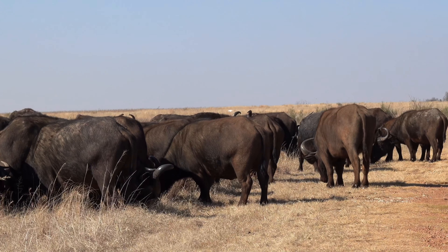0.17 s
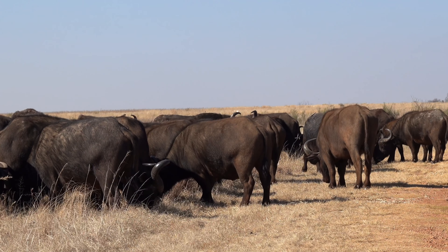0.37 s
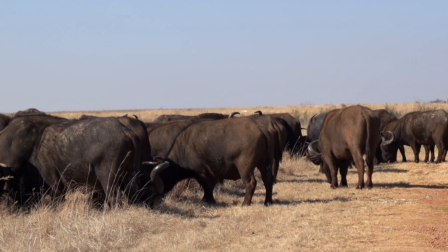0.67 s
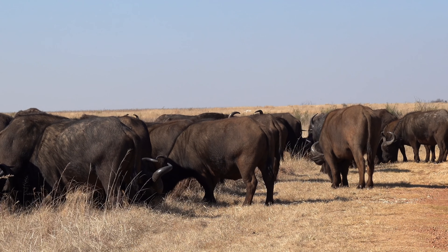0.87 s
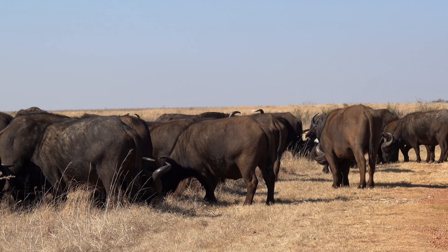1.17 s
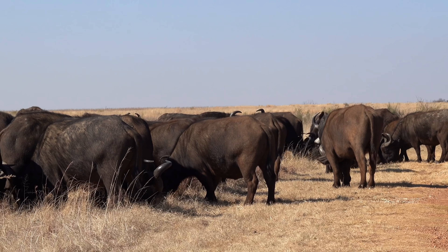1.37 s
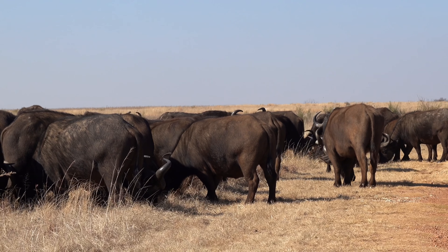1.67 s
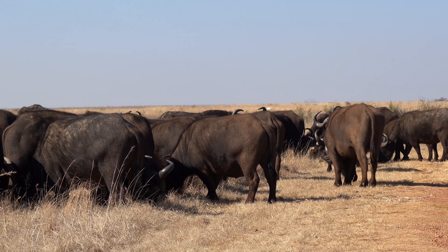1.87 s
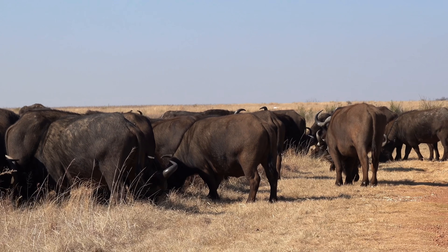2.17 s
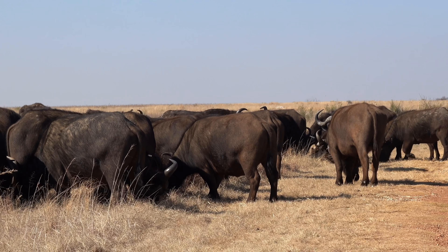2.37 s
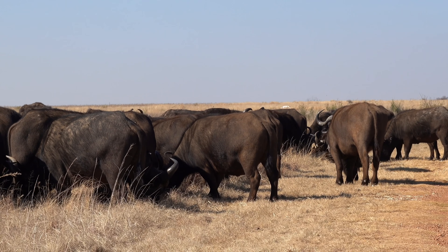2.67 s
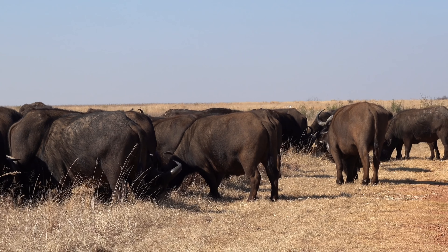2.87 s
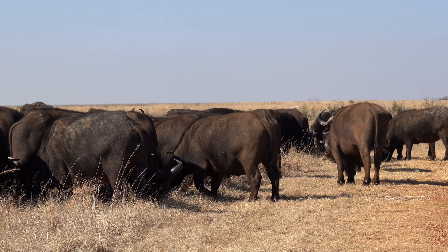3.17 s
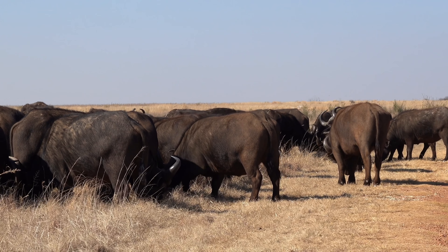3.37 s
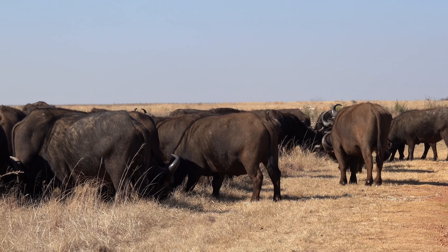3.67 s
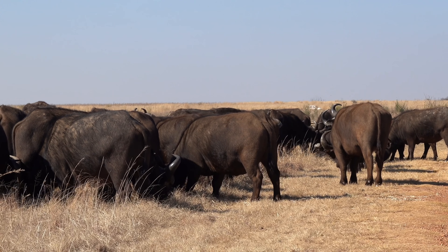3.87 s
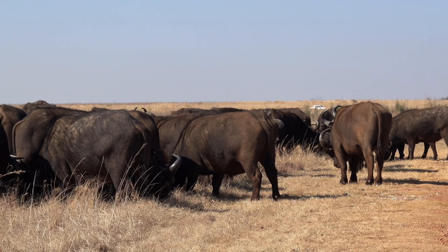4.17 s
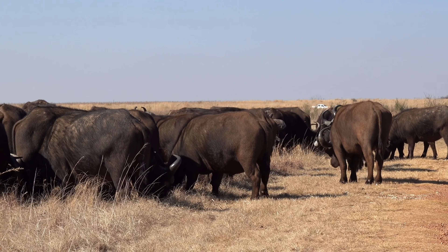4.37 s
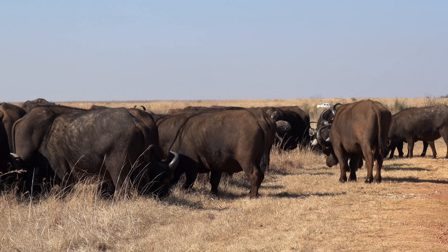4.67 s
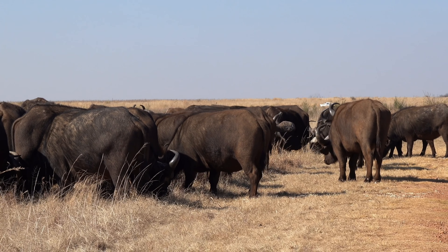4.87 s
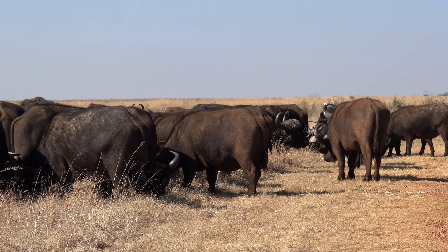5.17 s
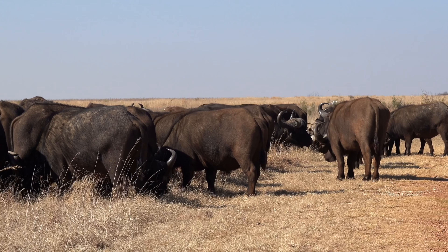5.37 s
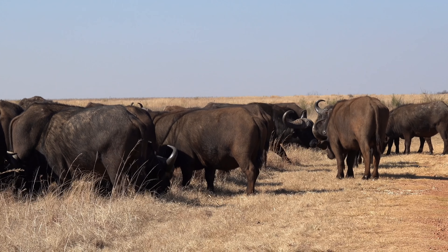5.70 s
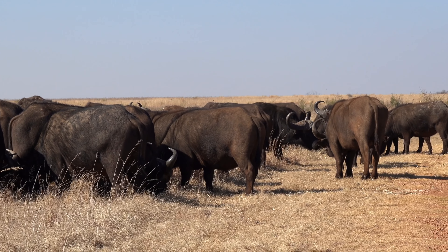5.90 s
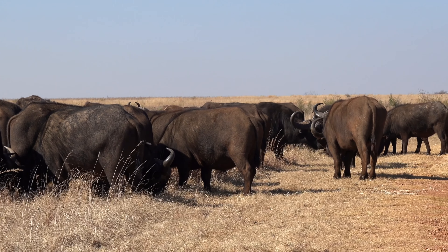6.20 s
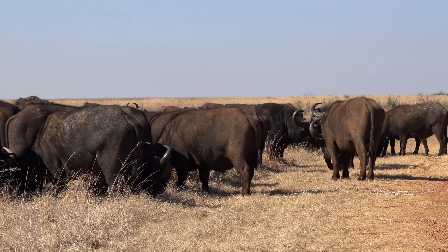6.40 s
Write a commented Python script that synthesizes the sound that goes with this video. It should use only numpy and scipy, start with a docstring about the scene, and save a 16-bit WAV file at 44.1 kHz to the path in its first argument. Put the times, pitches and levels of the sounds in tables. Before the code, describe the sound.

A buffalo grunts, then twice growls and swells into a deep bellow, with dry stalks snapping between the calls in quiet grassland.

```python
"""The sound switches on with a sharp click; over faint grassland wind and an insect trill, a buffalo grunts.
Its vocal folds flap, stick and burst open, ringing a long throat; one effort drives chest, mouth and rasp.
It rumbles, then swells from a slow growl into a bellow that ends in a slack flap and a huff of air.
Dry stalks rustle and snap under the hooves. Then a second growl swells into a bellow, its loudest
pulses overloading the microphone, and a last huff dies away."""
import sys
import numpy as np
from scipy import signal
from scipy.io import wavfile

SR = 44100
rng = np.random.default_rng(int(sys.argv[2]) if len(sys.argv) > 2 else 0)


def wrap_up_sound(samples):
    """Save the sound to the file named by the first command line argument, as 16-bit audio."""
    columns = np.atleast_2d(samples).T
    # keep every value between -1 and 1, then stretch to whole-number steps
    tamed = np.clip(columns, -1, 1)
    steps = np.round(tamed * 32767).astype(np.int16)
    wavfile.write(sys.argv[1], SR, steps)


N = 288414
TIME = np.arange(N) / SR


def gain_of(db):
    """Turns decibels into a multiplier."""
    return 10 ** (np.asarray(db) / 20)


def evened(x):
    """Scales a sound to an average (rms) level of 1."""
    return x / np.sqrt(np.mean(x ** 2) + 1e-20)


def steadied(x, span_s):
    """Holds the running level near 1 while keeping the single pulses."""
    window = np.hanning(int(span_s * SR))
    weight = signal.fftconvolve(np.ones(len(x)), window, "same")
    power = signal.fftconvolve(x ** 2, window, "same") / weight
    return x / np.sqrt(power + np.mean(x ** 2) / 100)


def curves(rows, t):
    """Joins the rows of a table by straight lines in time."""
    times, *columns = np.transpose(rows)
    return [np.interp(t, times, column) for column in columns]


def look_up(points, hz):
    """Reads a table's value at any pitch."""
    pitches, values = np.transpose(points)
    return np.interp(np.log(hz + 1), np.log(pitches + 1), values)


def add(mix, start_s, sound):
    """Lays a sound into the mix."""
    part = mix[max(round(start_s * SR), 0):][:len(sound)]
    part += sound[:len(part)]


def colour(x, points, size=2048):
    """Shapes the tone of a sound with (pitch_hz, level_db) points."""
    log_gain = np.log(gain_of(look_up(points, abs(np.fft.fftfreq(size, 1 / SR)))))
    taps = np.fft.ifft(np.exp(np.conj(signal.hilbert(log_gain)))).real[:size // 2]
    return signal.fftconvolve(x, taps)[:len(x)]


def resonate(x, hz, width_hz):
    """Makes a sound ring at a pitch that may glide; narrower rings longer."""
    turn = np.exp(2j * np.pi * np.cumsum(hz * np.ones(len(x))) / SR)
    decay = np.exp(-np.pi * width_hz / SR)
    return 2 * (turn * signal.lfilter([1 - decay], [1, -decay], x / turn)).real


# The tone of open air: pitch_hz, level_db
WIND_TONE = [(25, -16.5), (60, -9.5), (120, -3.5), (250, -7.5), (500, -5.5), (950, -5.5), (1500, -13.5),
             (2500, -20), (4000, -25.5), (8000, -36), (15500, -39)]
def wind(level_db=-70.5):
    """Moving air makes a soft, steady rush."""
    return gain_of(level_db) * evened(colour(rng.standard_normal(N), WIND_TONE))


# The tone of dry grass: pitch_hz, level_db
GRASS_TONE = [(1000, -2.5), (2500, -2.5), (4500, -2.5), (7000, -7), (11000, -15), (16000, -15)]
# How the rustling rises and falls: time_s, relative_level_db
RUSTLE_SWELLS = [(3.3, -88), (3.474, -94), (3.778, -81.5), (4.128, -87), (4.242, -81.5), (4.436, -86.5),
                 (4.758, -92.5), (5.0, -88)]
def rustle(spread_db=3, grains_per_s=2500, boost_db=4.5):
    """Hooves shuffle through dry grass, making many tiny ticks."""
    grains = rng.standard_normal(N) * gain_of(spread_db * np.minimum(rng.exponential(1, N), 5))
    grains *= rng.random(N) < grains_per_s / SR
    shuffling = np.interp(TIME, [3.2, 3.5, 4.6, 5.0], [0, 1, 1, 0])
    level_db = curves(RUSTLE_SWELLS, TIME)[0] + boost_db
    return shuffling * gain_of(level_db) * evened(colour(grains, GRASS_TONE))


# Bouts of insect song: start_s, end_s, pitch_hz
INSECT_TRILLS = [(0.303, 1.02, 13000), (1.213, 2.012, 12900), (2.23, 3, 13000), (3.203, 4.018, 13000),
                 (4.305, 5.013, 12850), (5.19, 5.9, 13100), (6.204, 6.535, 12900)]
def insect(level_db=-92):
    """An insect's wings make a thin, high trill that comes and goes."""
    out = np.zeros(N)
    for start_s, end_s, hz in INSECT_TRILLS:
        wing = resonate(resonate(rng.standard_normal(SR), hz, 200), hz, 200)
        wing = wing[:int((end_s - start_s) * SR)]
        add(out, start_s, gain_of(level_db) * evened(wing) * signal.windows.tukey(len(wing), .15))
    return out


# How long the plain's echo takes to fade by 60 dB: pitch_hz, fade_s
ECHO_FADES = [(100, 1), (1000, 0.32), (4000, 0.18), (12000, 0.33)]
def field_echo(x, early_db, tail_db, early_s=0.028):
    """Sound bounces off nearby bodies and ground, then the plain adds a faint tail."""
    t = np.arange(SR * 3 // 4) / SR
    bounces = rng.choice([-1., 1.], len(t)) * (rng.random(len(t)) < 2500 / SR) * (t > .004)
    hz, frame_s, spectrum = signal.stft(bounces, SR, nperseg=256)
    fade = gain_of(-60 * frame_s / look_up(ECHO_FADES, hz)[:, None])
    tail = signal.istft(spectrum * fade, SR, nperseg=256)[1][:len(t)]
    early = bounces * np.exp(-t / early_s)
    echo = gain_of(early_db) * early / np.linalg.norm(early)
    echo += gain_of(tail_db) * tail / np.linalg.norm(tail)
    return x + signal.fftconvolve(x, echo)[:N]


def switch_on_click(start_s=.255, peak_db=-24.5, decay_s=0.0013):
    """The sound switches on with a sharp click."""
    out = np.zeros(N)
    add(out, start_s, gain_of(peak_db) * np.exp(-TIME[:SR // 20] / decay_s))
    return out


# Dry stalks snapping: start_s, peak_db, decay_s
STALK_SNAPS = [(1.067, -53, 0.0036), (3.829, -45, 0.01), (3.842, -51, 0.015), (3.921, -52, 0.0064),
               (4.0942, -31, 0.0021), (4.0984, -24, 0.001), (4.553, -49.5, 0.0022), (4.561, -48.5, .002),
               (5.558, -37.5, 0.0006)]
# The tone of a snap: pitch_hz, level_db
SNAP_TONE = [(25, -40), (80, -12), (200, -16), (340, -4), (450, -7), (770, -2), (950, -5), (1320, -13.5),
             (1550, -6.5), (1750, -17.5), (2120, -8.5), (2550, -17), (2970, -15.5), (5600, -24.5),
             (10000, -31), (15000, -49)]
# The thickest stalk knocks as it breaks: start_s, level_db
STALK_KNOCKS = [(4.095, -30), (4.0985, -28)]
# The notes in each knock: pitch_hz, relative_level_db, decay_s
KNOCK_NOTES = [(152, -17, .005), (327, -7, .0035), (510, -7.5, 0.0019), (760, -7, 0.0018),
               (1320, 1.5, 0.0024), (2980, -2, 0.00074)]
def stalks(settle_db=-41, settle_s=0.12, size=16384):
    """Each stalk cracks and splinters; then the grass around it settles."""
    out, t = np.zeros(N), np.arange(size) / SR
    for start_s, db, decay_s in STALK_SNAPS:
        splinters = rng.standard_normal(size) * np.exp(-t / decay_s)
        splinters[0] += 5  # the first sharp crack
        snap = colour(splinters, SNAP_TONE)
        grass = evened(colour(rng.standard_normal(size), GRASS_TONE))
        settling = gain_of(settle_db) * grass * np.exp(-t / settle_s)
        add(out, start_s, gain_of(db) * (snap / abs(snap).max() + settling))
    for start_s, db in STALK_KNOCKS:
        for k, (hz, note_db, decay_s) in enumerate(KNOCK_NOTES):
            note = np.exp(-t / decay_s) * np.sin(2 * np.pi * hz * t)
            add(out, start_s, -(-1) ** k * gain_of(db + note_db) * note)
    return out


# The tone of the buffalo's breath: pitch_hz, level_db
BREATH_TONE = [(30, 1.5), (130, 9.5), (300, 1), (600, -4.5), (750, -4.5), (980, 7.5), (1400, -14.5),
               (1900, -6), (2600, -22), (3200, -21), (5500, -34), (8000, -46), (15000, -48.5)]
# Breaths blown out: start_s, fade_s, level_db
BREATH_HUFFS = [(0.548, 0.064, -46), (0.618, 0.25, -65.5), (1.758, 0.16, -63), (2.941, 0.15, -45),
                (3.069, 0.13, -44), (6.357, 0.15, -50), (6.457, 0.36, -50.5)]
def huffs(rise_s=0.02, fade_db=-16.5):
    """Spare air rushes out through the open throat and dies away."""
    out = np.zeros(N)
    for start_s, fade_s, db in BREATH_HUFFS:
        t = np.arange(0, 2 * fade_s, 1 / SR)
        air = evened(colour(rng.standard_normal(len(t)), BREATH_TONE))
        add(out, start_s, air * np.minimum(t / rise_s, 1) * gain_of(db + fade_db * (t / fade_s) ** 2))
    return out


# Last flaps after a call: start_s, thump_db, throat_hz, puff_db
SLACK_FLAPS = [(0.586, -33.5, 159, -41), (0.657, -42.5, 141, -51), (1.685, -45.5, 134, -55.5),
               (1.785, -44.5, 96, -59), (3.034, -27.5, 77.2, -53), (6.406, -26.5, 115, -44.5)]
def slack_flaps(thump_s=.011, puff_s=0.0076, size=4096):
    """Each loose closing of the vocal folds thumps the throat and lets out a puff of air."""
    out, t = np.zeros(N), np.arange(size) / SR
    for start_s, thump_db, throat_hz, puff_db in SLACK_FLAPS:
        thump = np.exp(-t / thump_s) * np.sin(2 * np.pi * throat_hz * t)
        puff = np.exp(-t / puff_s) * evened(colour(rng.standard_normal(size), BREATH_TONE))
        add(out, start_s, gain_of(thump_db) * thump + gain_of(puff_db) * puff)
    return out


def waver(count, share=.018, span_s=.09):
    """Wanders slowly around 1: a soft throat never holds its ringing quite still."""
    drift = signal.fftconvolve(rng.standard_normal(count), np.hanning(int(span_s * SR)), "same")
    return 1 + share * evened(drift)


# The stuck vocal folds burst open: start_s, extra_db
FOLD_BURSTS = [(0.2605, 0.5), (0.3267, 4), (0.3526, 0.5), (.378, 1), (0.4233, 11), (0.4526, 15.5),
               (.51, 3.5), (1.929, 5), (1.969, 6), (2.0625, 4.5), (2.0943, 5), (2.1255, 10), (2.153, 9.5),
               (2.178, 8), (2.197, 8), (2.2268, 8), (2.2654, 7), (2.293, 7), (2.325, 7.5), (2.371, 1),
               (2.39, 5.5), (2.423, 11.5), (2.4571, 9), (2.53, 5.5), (2.5525, 5), (2.58, 4.5), (2.604, 7.5),
               (2.642, 4), (2.677, 0.5), (2.7225, 6.5), (2.7479, 3.5), (2.77, 5.5), (2.824, 7.5),
               (2.891, 3), (2.934, 2), (2.957, 3), (5.544, -1), (5.556, 0), (5.848, 4.5), (5.921, 4.5),
               (6.0241, 8.5), (6.054, 7), (6.1048, 5), (6.126, 4.5), (6.159, 4.5), (6.298, 4)]
def vocal_folds(t, rate_hz, jitter_s, shimmer_db, limp_db=5.5, limp_above_hz=118, stick=0.78):
    """The folds click each time they close; a burst restarts them with a brief extra push."""
    bursts = [(t[0], 0)] + [row for row in FOLD_BURSTS if t[0] < row[0] < t[-1]]
    turns, clicks = np.cumsum(rate_hz) / SR, np.zeros(len(t))
    for (start_s, extra_db), (end_s, next_db) in zip(bursts, bursts[1:] + [(t[-1], 0)]):
        late, uneven = rng.standard_normal((2, 64))
        first, last = np.interp([start_s, end_s], t, turns)
        k = np.arange(max(round(last - first), 1))
        step = (last - first) / len(k) if end_s < t[-1] else 1  # whole cycles between bursts
        click_s = np.interp(first + step * k, turns, t) + jitter_s * late[k] * (k > 0)
        db = extra_db * np.exp(-(k / 1.25) ** 2) + shimmer_db * uneven[k] * (k > 0)
        tight = np.interp(click_s, t, rate_hz) > limp_above_hz
        db -= limp_db * (k % 2) * tight  # tight folds alternate strong and weak
        db[-1] -= stick * next_db * (len(k) > 2) * (next_db > 5)  # they stick before a big burst
        samples = np.round((click_s - t[0]) * SR).astype(int)
        np.add.at(clicks, np.clip(samples, 0, len(t) - 1), gain_of(db))
    return clicks


def chest_boom(pulses, breath, throat_hz, width_hz):
    """Pulses ring the throat's lowest note; breath in the open throat only rumbles."""
    ring = resonate(pulses, throat_hz * waver(len(pulses)), width_hz)
    ring += 0.35 * resonate(breath, throat_hz, 150)
    return colour(ring, [(8, -18), (30, 3.5), (50, 7.5), (80, -1.5), (140, 4.5), (230, 0),
                         (310, -15.5), (600, -4.5), (2000, -36.5), (8000, -53.5)])


# Upper notes of throat and muzzle: base_pitch_hz, width_hz, relative_level_db
MUZZLE_NOTES = [(814, 360, -11.5), (949.6, 59, 0.5), (1008, 48, 3.5), (1101.6, 22, 1.5), (1417, 120, -0.5)]
def muzzle_ring(drive, shift, second_hz, second_db, nose_hz, nose_db):
    """Throat, nose and moving mouth ring together, giving the call its vowel."""
    ring = gain_of(second_db) * resonate(drive, second_hz, 41)
    ring += gain_of(nose_db) * resonate(drive, nose_hz, 70)
    ring += sum(gain_of(db) * resonate(drive, hz * shift, width) for hz, width, db in MUZZLE_NOTES)
    return colour(ring, [(150, -14.5), (400, 10), (1250, 5), (1650, -19), (2600, -27), (8000, -61)])


def throat_rasp(clicks, air, notes, mouth, flap):
    """Clicks and rushing air ring the throat's highest notes."""
    drive = colour(clicks, [(2400, -2), (4000, -7), (8000, -24.5)]) + air
    rasp = np.zeros(len(clicks))
    for base_hz, width, db in notes:
        hz = base_hz * mouth * (1 + .7 * flap * (base_hz < 3000))
        rasp += gain_of(db) * resonate(resonate(drive, hz, width), hz, width)
    return rasp


MOUTH_GROWTH, RASP_GROWTH = 1.158, 1.88  # dB gained per dB of effort; the chest gains 1
OPEN_S, SHUT_DB = 0.037, -9  # the mouth opens as a call starts; shut, it muffles the muzzle
MOUTH_FOLLOWS, MOUTH_SAG_PER_S = .12, 0.054  # upper notes follow the lowest a little and slowly sink
HOARSE_DB, HOARSE_S = 10.5, 0.089  # the rasp stands out at the end of a call
def call(shape, rasp_notes, jitter_s, shimmer_db, rough, hiss, puff_s, chest_width_hz, flutter,
         nose_hz, nose_db, second_db, gape, shut_s, chest_db, mouth_db, rasp_db, seal=0):
    """Fold clicks and puffs of air ring chest, muzzle and rasp; effort brightens the voice."""
    t = np.arange(shape[0][0], shape[-1][0], 1 / SR)
    effort_db, rate_hz, first_hz, second_hz = curves(shape, t)
    opening = np.clip(np.minimum((t - t[0]) / OPEN_S, (t[-1] - t) / shut_s), 0, 1)
    hoarse_db = HOARSE_DB * np.exp((t - t[-1]) / HOARSE_S)
    sag = 1 - MOUTH_SAG_PER_S * (t - t[0])
    mouth = gape * (first_hz / first_hz.max()) ** MOUTH_FOLLOWS * sag * waver(len(t))

    clicks = evened(vocal_folds(t, rate_hz, jitter_s, shimmer_db))
    flow = evened(signal.lfilter([1], [1, -np.exp(-1 / (puff_s * SR))], clicks))
    air = rng.standard_normal(len(t))
    leak = (rate_hz / rate_hz.max()) ** seal  # with seal above 0, slower folds leak less air
    puffs = evened((flow + 0.18) * air) * leak
    breath = air * np.clip((-10 - effort_db) / 10, 0, 1) * (rate_hz > 45)  # takes over at low effort
    last_click_s = np.maximum.accumulate(t * (clicks > 0))
    cycle = np.minimum((t - last_click_s) * rate_hz, 1)
    flap = flutter * (cycle - .3)  # slow pulses flap the throat: its notes rise through each cycle

    chest = chest_boom(clicks + 0.28 * rough * puffs, breath, first_hz, chest_width_hz)
    drive = clicks + rough * puffs + 1.2 * breath
    muzzle = muzzle_ring(drive, mouth * (1 + flap), second_hz, second_db, nose_hz, nose_db)
    rasp = throat_rasp(clicks, hiss * puffs + 0.5 * breath, rasp_notes, mouth, flap)
    fizz = colour(evened((flow + 1) * air), [(2000, -14.5), (6000, -1.5), (9000, -10.5), (15000, -22)])
    rasp += gain_of(-36 - hoarse_db) * fizz
    parts = [(chest, chest_db + effort_db),
             (muzzle, mouth_db + MOUTH_GROWTH * effort_db + SHUT_DB * (1 - opening)),
             (rasp, rasp_db + RASP_GROWTH * effort_db + hoarse_db)]
    voice = sum(gain_of(db) * steadied(part, span_s=0.11) for part, db in parts)
    return t[0], voice * np.clip((t[-1] - t) / 0.01, 0, 1)


# How each call moves: time_s, effort_db, fold_rate_hz, first_throat_note_hz, second_throat_note_hz
OPENING_GRUNT = [(.255, -4, 101, 160, 610), (.33, -6, 81.3, 170.5, 643), (.4, -2.5, 84.6, 192, 630),
                 (.445, -2, 76.2, 176, 638), (.51, -7.5, 60.4, 159, 664), (.58, -24, 52.7, 133, 645)]
LOW_RUMBLE = [(1.03, -10.5, 53.8, 109, 546), (1.16, -2, 56.2, 110, 526), (1.27, -9, 56.7, 113, 545)]
FIRST_GROWL = [(1.27, -6.5, 34.6, 156, 550), (1.34, 0.5, 30.4, 161, 570), (1.4, 0, 31.25, 174.4, 600),
               (1.59, -1, 22, 161.6, 527), (1.72, -18.5, 12.4, 127, 540)]
FIRST_BELLOW = [(1.853, -26.5, 114.1, 150, 600), (1.88, -11.5, 122.1, 156, 620),
                (2.02, -4.5, 141.9, 187.3, 631), (2.15, 0.5, 109.3, 230.6, 600),
                (2.32, -0.5, 100.8, 229, 562.6), (2.46, -1, 78.7, 212, 612), (2.57, -3, 81, 179.6, 556),
                (2.66, -3, 83.3, 208.2, 550.7), (2.79, -2, 73.04, 205.4, 553),
                (2.88, -5.5, 72.65, 142.2, 604), (2.94, -8, 63.6, 118.1, 629),
                (2.99, -21.5, 48.2, 100.4, 647)]
SECOND_GROWL = [(5.087, -6.5, 32.96, 182, 560), (5.2, -4, 34.86, 201, 616), (5.28, -2.5, 34.73, 200, 600),
                (5.35, -3, 33.78, 200, 577), (5.45, -1, 33.58, 202, 572), (5.56, -3.5, 25.57, 193, 565),
                (5.79, -7.5, 24.43, 180, 557)]
SECOND_BELLOW = [(5.775, -23.5, 116.8, 178, 585), (5.825, -10, 128.3, 188, 571),
                 (5.94, -3.5, 142.6, 197.4, 587), (6.04, 1.5, 102.7, 250, 565), (6.11, -1, 90.2, 228, 596),
                 (6.2, -0.5, 89.2, 228, 611), (6.335, -5, 76.5, 164.5, 635), (6.4, -19, 66.8, 120.5, 622)]
# The throat's highest notes, one list a call (the rumble shares the first growl's):
# base_pitch_hz, width_hz, relative_level_db
RASP_NOTES = [
    [(1450, 80, -0.5), (1813, 200, 4), (2080, 230, -4.5), (2480, 84, -9), (3130, 960, -18),
     (4960, 820, -21.5)],
    [(1390, 200, -3), (1590, 260, -3.5), (2400, 620, -18), (3440, 340, -21), (4880, 1500, -47)],
    [(1843, 52, -1), (2040, 380, 2), (2396, 140, -6), (2690, 200, -8), (3140, 360, -9.5),
     (3950, 1000, -16.5), (4930, 620, -20)],
    [(1390, 450, 6.5), (1712, 100, 7.5), (2130, 370, 0.5), (3260, 550, -9.5), (4600, 520, -12),
     (5300, 390, -39)],
    [(1360, 340, 15.5), (1880, 110, -4), (2385, 280, 5.5), (2750, 200, -6.5), (3490, 310, -7.5),
     (4160, 860, -24.5), (6200, 570, -50.5)],
]
def buffalo():
    """A grunt, a closed-mouth rumble, then two growls that each swell into a bellow."""
    out = np.zeros(N)
    add(out, *call(OPENING_GRUNT, RASP_NOTES[0], jitter_s=.0005, shimmer_db=1.8, rough=.25, hiss=.5,
                   puff_s=.005, chest_width_hz=42, flutter=0, nose_hz=467, nose_db=-4.5, second_db=0.5,
                   gape=0.96, shut_s=0.0086, chest_db=-23.5, mouth_db=-30.5, rasp_db=-46.5))
    add(out, *call(LOW_RUMBLE, RASP_NOTES[1], jitter_s=.0004, shimmer_db=.8, rough=.6, hiss=5,
                   puff_s=.011, chest_width_hz=40, flutter=0, nose_hz=400, nose_db=-19, second_db=-6,
                   gape=0.94, shut_s=.03, chest_db=-56.5, mouth_db=-69, rasp_db=-91))
    add(out, *call(FIRST_GROWL, RASP_NOTES[1], jitter_s=.0004, shimmer_db=.8, rough=.6, hiss=5,
                   puff_s=.011, chest_width_hz=24, flutter=.2, nose_hz=400, nose_db=-22, second_db=1,
                   gape=1.082, shut_s=0.22, chest_db=-45, mouth_db=-55, rasp_db=-68))
    add(out, *call(FIRST_BELLOW, RASP_NOTES[2], jitter_s=.0007, shimmer_db=1.3, rough=.2, hiss=.9,
                   puff_s=.004, chest_width_hz=36, flutter=0, nose_hz=378, nose_db=-10, second_db=1.5,
                   gape=1.06, shut_s=0.056, chest_db=-22.5, mouth_db=-20.5, rasp_db=-40))
    add(out, *call(SECOND_GROWL, RASP_NOTES[3], jitter_s=.0009, shimmer_db=1.2, rough=1.8, hiss=4,
                   puff_s=.018, chest_width_hz=75, flutter=.4, nose_hz=366, nose_db=-29, second_db=5,
                   gape=1.045, shut_s=0.022, chest_db=-44.5, mouth_db=-47, rasp_db=-51.5, seal=2.5))
    add(out, *call(SECOND_BELLOW, RASP_NOTES[4], jitter_s=.0002, shimmer_db=1, rough=.14, hiss=.6,
                   puff_s=.004, chest_width_hz=42, flutter=0, nose_hz=354.5, nose_db=-4, second_db=0,
                   gape=1.037, shut_s=0.083, chest_db=-22.5, mouth_db=-20.5, rasp_db=-31))
    return out + slack_flaps() + huffs()


def scene():
    """After a click, the buffalo and the stalks echo lightly over wind, grass and insect."""
    foreground = field_echo(switch_on_click() + buffalo(), early_db=-16, tail_db=-30)
    snaps = field_echo(stalks(), early_db=-15, tail_db=-29)
    fade_in = np.clip((TIME - .22) / 0.034, 0, 1)
    background = (wind() + rustle() + insect()) * fade_in
    return (foreground + snaps + background)[None]


def record(dry, ceiling=0.23, hardness=12, top_hz=15850):
    """The microphone overloads, flattening the loudest peaks; the highest treble is cut."""
    clipped = dry / (1 + (dry / ceiling) ** (2 * hardness)) ** (1 / (2 * hardness))
    treble_cut = signal.firwin(511, top_hz, window=("kaiser", 9), fs=SR)
    return signal.oaconvolve(clipped, treble_cut[None], "same")


dry = scene()
out = record(dry)
wrap_up_sound(out)
```